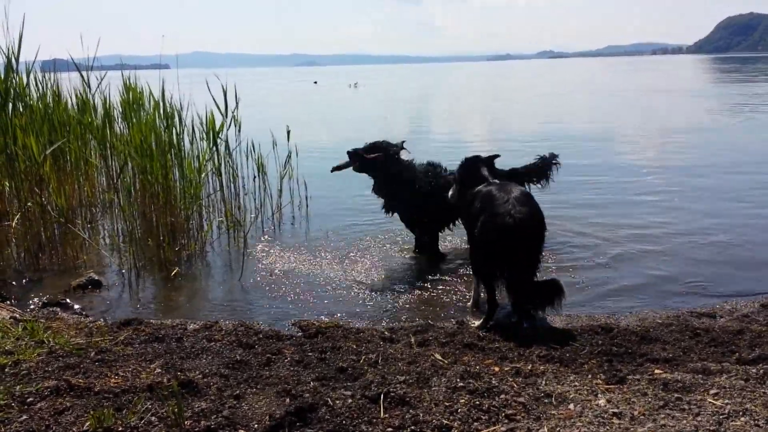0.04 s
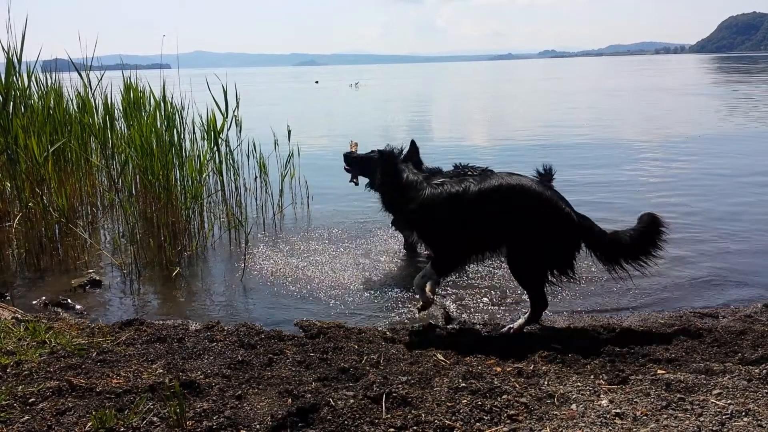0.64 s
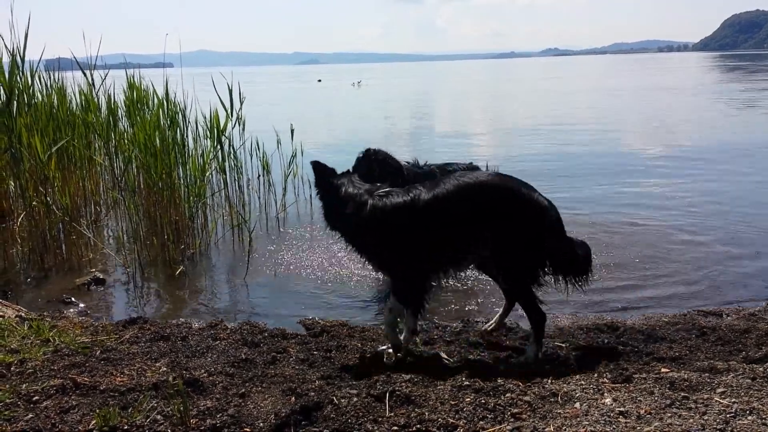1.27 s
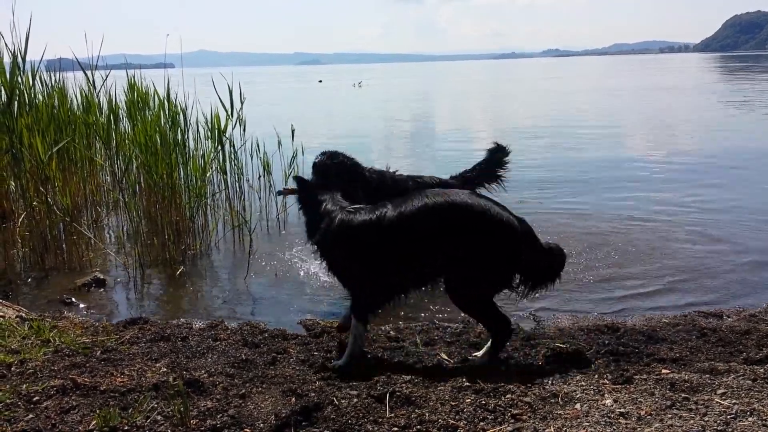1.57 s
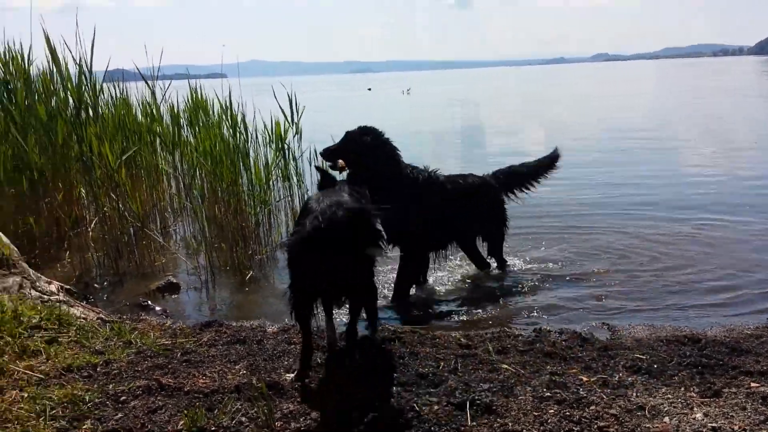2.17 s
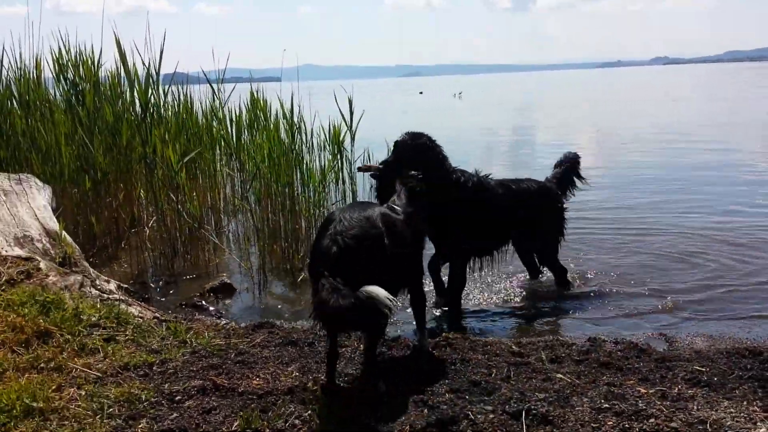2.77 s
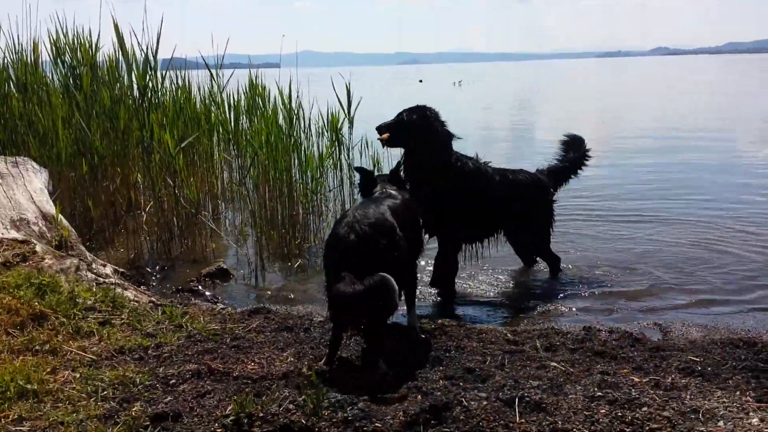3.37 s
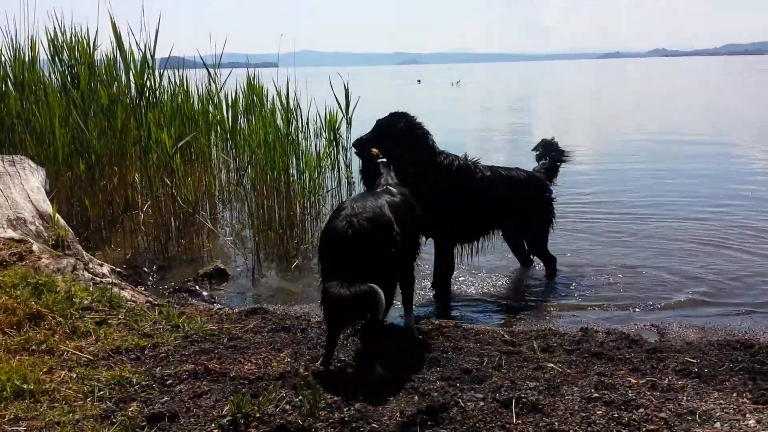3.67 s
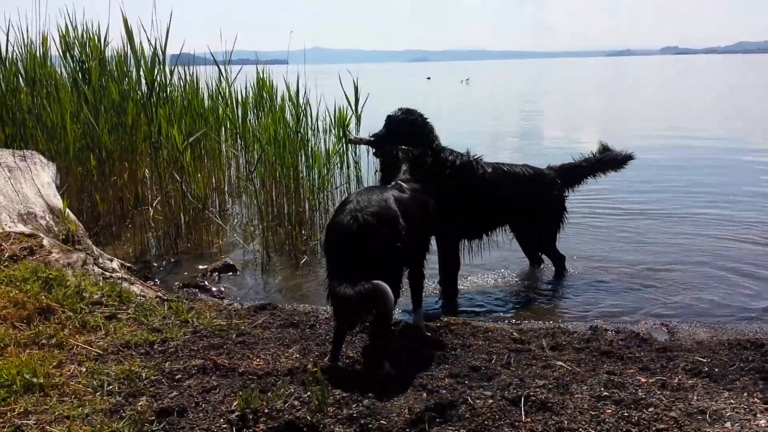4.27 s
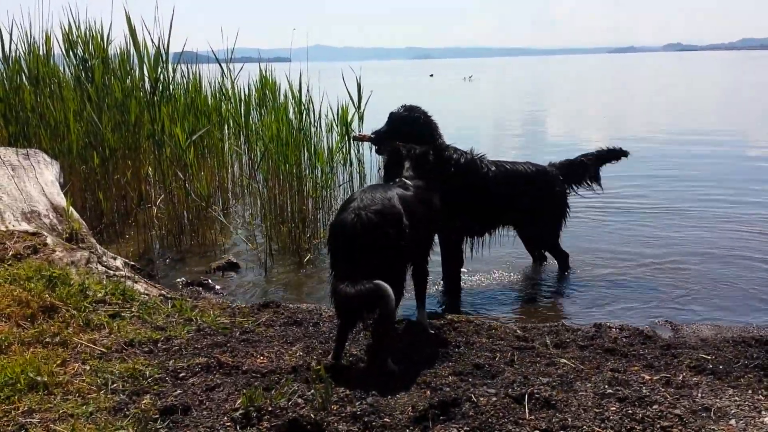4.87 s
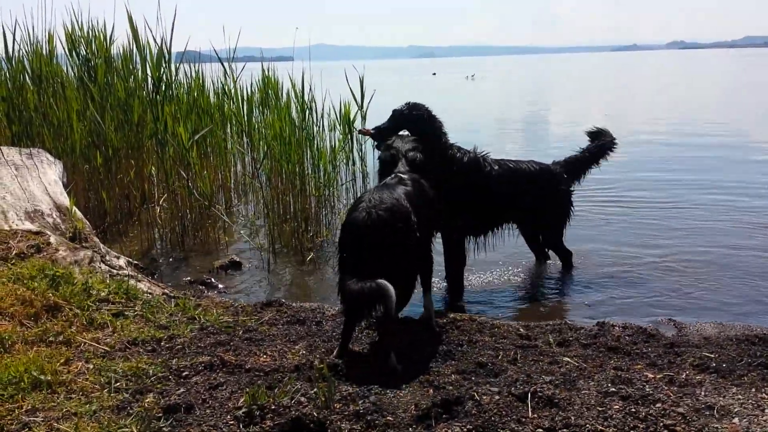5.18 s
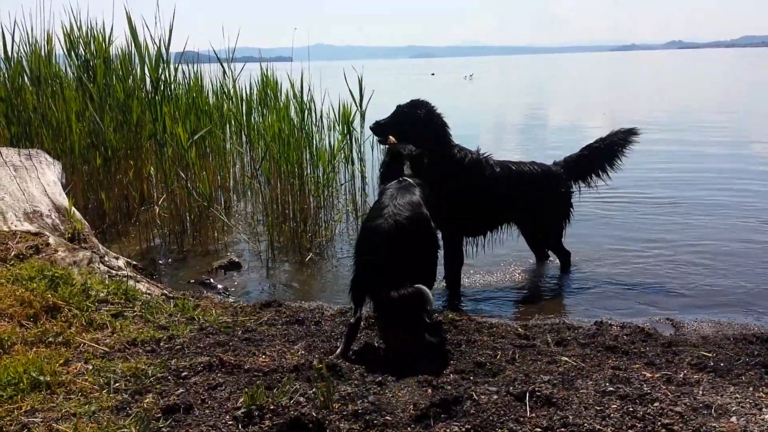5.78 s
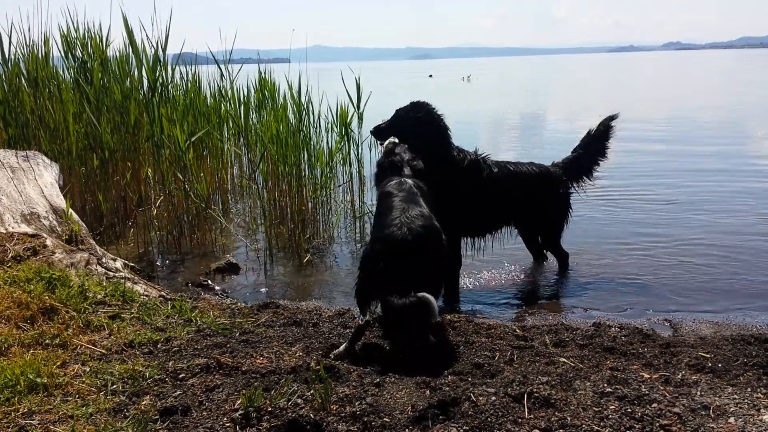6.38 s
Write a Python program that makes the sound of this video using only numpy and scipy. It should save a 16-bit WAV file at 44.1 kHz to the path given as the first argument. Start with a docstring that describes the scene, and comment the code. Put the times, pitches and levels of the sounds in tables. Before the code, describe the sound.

A dog's paws crunch on gravel with collar tags jingling, then shallow water splashes and drips over a low, distant engine drone.

```python
"""Paws crunch over wet gravel and collar tags jingle as a dog trots along a lake shore.
A second dog wades in the shallows, its legs throwing spray and folding air into the water as bubbles.
Drops then fall from a soaked coat and paws scuff the grit. A far engine drones across the lake, and a
bird calls faintly. The near sounds and the air are coloured by a small camera's hollow housing and its
two ports, which ring at different pitches."""
import sys
import numpy as np
from scipy import signal
from scipy.fft import rfft, irfft, next_fast_len
from scipy.io import wavfile
from scipy.ndimage import uniform_filter1d

SR = 44100
rng = np.random.default_rng(int(sys.argv[2]) if len(sys.argv) > 2 else 0)


def transcribe(signal):
    """Save signal, clipped to [-1, 1], as a 16-bit WAV file at the path in sys.argv[1]."""
    frames = np.atleast_2d(signal).T
    limited = np.clip(frames, -1, 1)
    pcm = np.round(limited * 32767).astype(np.int16)
    wavfile.write(sys.argv[1], SR, pcm)


N = 287973
TIME = np.arange(N) / SR

# grit under a paw: start_s, level_db, snap_db, thud_db, left_right_db, pebble_hz
PAW_CRUNCHES = [(0.1308, -18.5, 7, -24, 2, 6900), (0.1388, -17, 7, -30, 2, 4250),
                (0.172, -19, 13, -18, 0, 6560), (0.177, -26, 7, -3, 1, 6650),
                (0.1803, -27, 16, -20, -2, 6800), (0.1845, -31, 21, -36, 0, 7000),
                (0.278, -27.5, 2, -2.5, -2.5, 5000), (0.3489, -13, 11, -33, 8, 6970),
                (0.357, -24.5, 17.5, -40, -10, 6960), (0.3663, -36, 10, -38, -2, 6700),
                (0.3952, -15, 20, -18, 1, 6640), (0.4093, -25, 14, -25, -4, 6900),
                (0.4228, -18.5, 16, -28, 1, 7040), (0.4263, -16.5, 16, -26, 2, 6900),
                (0.5028, -21, 10, -7.5, 2, 4800), (0.5368, -22, 13, -18, 1, 6500),
                (0.5665, -17.5, 0, -20, 2, 7200), (0.579, -16.5, 17.5, -27, 2, 7320),
                (0.6057, -19, 3, -7, 1, 6560), (0.6132, -23, 15, -15, -3, 6650),
                (0.7093, -23.5, 2, -6, -2.5, 6500), (0.7686, -25, 16, -28, 0, 6900),
                (0.7794, -12.5, 9.5, -26, 2.5, 4850), (0.7819, -22.5, 11, -25, -3, 6740),
                (0.8155, -11.5, 10, -32, 3, 6950), (0.8315, -15, -1, -26, -3, 7000),
                (0.8448, -17.5, 5, -14, 4, 6900), (0.9103, -23, 2, -5, 0, 4850),
                (0.98, -13.5, 10, -15, 2, 4970), (1.0188, -23.5, 12, -8, 2, 6900),
                (1.025, -21.5, 7, -11.5, 4, 7040), (1.151, -27.5, 14, -2.5, 1, 5200),
                (1.2537, -29, 17, -25, 0, 6900), (1.844, -19, 7.5, -27, -7, 7370),
                (1.866, -14, 6, -24, 0, 6400), (1.8704, -14.5, 13, -30, 4, 5140),
                (2.155, -23, 3.5, -4, 1, 4900), (2.36, -25.5, 11, -18.5, -1, 4940),
                (5.456, -27, 6, -27, -3, 6560), (5.467, -23, 0, -25, 3, 6500),
                (5.5982, -20, 15, -30, 5, 6760), (5.6508, -27, 9, -34, -1, 7000)]
# spectra of cracking grit and of the paw's thud: freq_hz, gain_db
GRIT_SPECTRUM = [(300, -32.5), (1500, -13.5), (2500, -3), (3200, -17), (4000, -2.5), (5000, 3), (5800, -2),
                 (6800, 7.5), (7600, -0.5), (8800, -9), (12000, -9.5), (14500, -12.5)]
THUD_SPECTRUM = [(100, -20), (250, -1), (450, 0), (700, -12), (1300, -4), (2400, -5.5), (3200, -11),
                 (6000, -23.5)]

def crunches(pebble_db=-2, burst_db=-4, crumble_db=-3.5, crumble_per_thud=0.22):
    """Each crunch is a snap that rings a pebble, a dying crumble of small grains and a duller thud."""
    snap, pebble, crumble, thud = np.zeros((4, 2, N))
    for start_s, level_db, snap_db, thud_db, left_right_db, pebble_hz in PAW_CRUNCHES:
        level = amp(level_db + np.array([[0.5], [-0.5]]) * left_right_db)
        burst = amp(burst_db) * dying(t60_s=0.011, rise_s=0.00084)
        # a heavier thud crumbles more grit
        loose = amp(crumble_db + crumble_per_thud * thud_db) * dying(t60_s=0.055, rise_s=0.0032)
        add(snap, start_s + 0.00074, level * amp(snap_db))
        add(pebble, start_s + 0.00044, level * ring(pebble_hz, t60_s=0.011, glide=0, onset_cycles=0.38))
        add(crumble, start_s, level * (burst + loose))
        add(thud, start_s, level * amp(min(thud_db, 0)) * dying(t60_s=0.066, rise_s=0.0051))
    bright = snap + crumble * grains(per_s=3500, spread_db=2.5)
    dull = amp(-3) * thud * grains(per_s=3100, spread_db=1.5)
    return camera(bright, GRIT_SPECTRUM) + amp(pebble_db) * camera(pebble) + camera(dull, THUD_SPECTRUM)


def trot(length_s=1.295, roll_db=-43, settle_db=-28):
    """Grit rolls under the trotting paws and settles again after each crunch."""
    rolling = amp(roll_db) * held(0, length_s, rise_s=0.0027, t60_s=0.27)
    settling = [amp(level_db + settle_db) * held(start_s, length_s=0.026, rise_s=0.026, t60_s=1)
                for start_s, level_db, *_ in PAW_CRUNCHES if start_s < length_s]
    return amp(-2.5) * patter(power_sum([rolling, *settling]), GRIT_SPECTRUM, flicker_db=1, ping_db=-4)


# paw drags, mostly as the dog sits down: start_s, length_s, level_db
PAW_DRAGS = [(1.082, 0.051, -40.5), (5.282, 0.16, -46.5), (5.45, 0.021, -30), (5.506, 0.04, -39.5),
             (5.561, 0.024, -35), (5.653, 0.045, -48.5), (5.75, 0.052, -44.5), (5.848, 0.027, -46),
             (5.978, 0.028, -49), (6.418, 0.04, -46.5), (6.459, 0.07, -38)]
# fine grit and small drops: freq_hz, gain_db
FINE_SPECTRUM = [(200, -44), (900, -7.5), (1500, -17.5), (2300, -1.5), (3200, -13), (4200, -5), (5000, 2.5),
                 (5900, -5), (6900, 8.5), (8800, -5.5), (12500, -6.5), (14500, -14)]

def scuffs(gain_db=0.5):
    """A dragged paw pushes fine grit for as long as it moves."""
    drag = power_sum(amp(level_db) * held(start_s, length_s, rise_s=0.032, t60_s=0.17)
                     for start_s, length_s, level_db in PAW_DRAGS)
    return amp(gain_db) * patter(drag, FINE_SPECTRUM, flicker_db=2.5, ping_db=-6)


# tag strikes: start_s, level_db, high_modes_db
TAG_STRIKES = [(0.0014, -21.5, 0), (0.139, -12, 0), (0.202, -18, -4), (0.321, -26, -1), (0.356, -18, -12),
               (0.524, -27, 3), (0.579, -10, 1), (0.5891, -12, 2), (0.786, -17, -1), (0.986, -22, 1)]
# tag modes: pitch_hz, level_db, t60_s
TAG_MODES = [(2444, -13, 0.064), (6675, -13, .05), (7160, 3, 0.06), (8030, -3, 0.06), (14370, -11, 0.06)]

def collar_tags(gain_db=-3, detune=0.0025, chatter_rad=0.9, uneven_db=3.5, high_above_hz=7600):
    """Small metal tags ring and chatter against each other; some strikes ring brighter than others."""
    out = np.zeros(N)
    t = np.arange(SR // 2) / SR
    for start_s, level_db, high_modes_db in TAG_STRIKES:
        for pitch_hz, mode_db, t60_s in TAG_MODES:
            level_draw, pitch_draw = rng.standard_normal(2)
            contact = unit(uniform_filter1d(rng.standard_normal(len(t)), SR // 200))
            tone = np.sin(2 * np.pi * pitch_hz * (1 + detune * pitch_draw) * t + chatter_rad * contact)
            strike_db = level_db + gain_db + mode_db + uneven_db * level_draw
            strike_db += high_modes_db * (pitch_hz > high_above_hz)
            add(out, start_s, amp(strike_db) * dying(t60_s, rise_s=0.0032) * tone)
    return camera(out)


# sheets of spray thrown by a leg: start_s, length_s, level_db, t60_s
LEG_SPLASHES = [(1.193, 0.41, -43.5, 2), (1.503, 0.085, -38, 0.86), (1.63, 0.18, -34.5, 1.5),
                (1.831, 0.1, -32, 0.69), (2.033, 0.019, -35.5, 1.1), (2.448, 0.039, -42, 0.56),
                (2.632, 0.048, -42, 0.3), (2.714, 0.32, -47, 0.54), (3.111, 0.2, -41, 0.24)]
# spectra of the spray and of its finest drops: freq_hz, gain_db
SPRAY_SPECTRUM = [(200, -31.5), (900, -1.5), (1600, -7), (2500, -0.5), (3200, -10.5), (4000, -3), (5100, 4),
                  (6000, -1.5), (7100, 4), (8500, -5), (11000, -8.5), (14500, -12.5)]
MIST_SPECTRUM = [(2000, -19), (6000, 12), (9000, -1), (14500, -15)]

def spray(gain_db=-2, rise_s=0.017, runoff_db=-17, mist_db=-11, mist_knee_db=-38):
    """Splashes rain back on the lake and water runs off the legs; hard splashes add a fine mist."""
    falling = power_sum(amp(level_db) * held(start_s, length_s, rise_s, t60_s)
                        for start_s, length_s, level_db, t60_s in LEG_SPLASHES)
    runoff = power_sum(amp(level_db + runoff_db) * held(start_s, length_s, rise_s, t60_s=6.5)
                       for start_s, length_s, level_db, _ in LEG_SPLASHES)
    mist_share = np.minimum(falling / amp(mist_knee_db), 1)
    mist = falling * mist_share * grains(per_s=6000, spread_db=15)
    rain = patter(power_sum([falling, runoff]), SPRAY_SPECTRUM, flicker_db=1.72, ping_db=-4, spread_db=2)
    return amp(gain_db) * rain + amp(mist_db) * camera(mist, MIST_SPECTRUM)


# legs pushing through water: start_s, length_s, level_db, bubble_hz, t60_s
LEG_STROKES = [(1.4, 0.046, -32.5, 980, 0.12), (1.46, 0.078, -36.5, 566, 0.35),
               (1.538, 0.062, -35, 950, 0.55), (1.632, 0.059, -33.5, 808, 0.46),
               (1.805, 0.028, -44, 750, 0.34), (1.884, 0.025, -36.5, 745, 0.27),
               (2.035, 0.035, -37.5, 534, 0.19), (2.164, 0.019, -42.5, 685, 0.31),
               (2.658, 0.023, -33.5, 1200, 0.15), (2.7, 0.11, -44.5, 700, 0.46)]
# froth around a leg: freq_hz, gain_db
FROTH_SPECTRUM = [(120, -24), (280, 5), (500, 4), (900, 7.5), (1320, 3.5), (1800, 1), (2600, 2),
                  (5000, -36)]

def slosh(bubbles_db=-5, froth_db=-9, spread_octaves=0.58, t60_cycles=22, count=70):
    """Each stroke folds air into the water: a dying cloud of bubbles in a rush of froth."""
    cloud, churn = np.zeros((2, N))
    for start_s, length_s, level_db, bubble_hz, t60_s in LEG_STROKES:
        bubbles = np.zeros(SR // 2)
        force = amp(level_db) * held(0, length_s, rise_s=0.0042, t60_s=t60_s)[:len(bubbles)]
        for k, (time_draw, pitch_draw, level_draw) in enumerate(rng.standard_normal((count, 3))):
            pitch_hz = np.clip(bubble_hz * 2 ** (spread_octaves * pitch_draw), 220, 2700)
            bubble = ring(pitch_hz, t60_cycles / pitch_hz, glide=0.17, onset_cycles=1.5)
            birth_s = (k + 0.385 * time_draw) / count / 2
            add(bubbles, birth_s, amp(2 * level_draw) * bubble)
        add(cloud, start_s, force * unit(bubbles))
        add(churn, start_s, force)
    at_ports = np.array([cloud, np.roll(cloud, shift=2)])  # slightly longer path to the right port
    froth = churn * grains(per_s=2200, spread_db=3.5, lag_samples=3.6)
    return amp(bubbles_db) * camera(at_ports) + amp(froth_db) * camera(froth, FROTH_SPECTRUM)


# hollows behind a plunging leg: start_s, length_s, start_hz, end_hz, level_db
WATER_HOLLOWS = [(1.375, 0.07, 830, 440, -32), (1.62, 0.045, 660, 1020, -27)]

def gulps():
    """A hollow rings lower as it opens and higher as the water closes it."""
    out = np.zeros(N)
    for start_s, length_s, start_hz, end_hz, level_db in WATER_HOLLOWS:
        sweep_hz = np.geomspace(start_hz, end_hz, int(length_s * SR))
        tone = wavering_tone(sweep_hz, depth=0.058, rate_hz=150)
        add(out, start_s, amp(level_db) * np.sqrt(np.hanning(len(tone))) * tone)
    return camera(out)


# large air pockets in the water, heavy drops from the coat: start_s, level_db, pitch_hz
AIR_POCKETS = [(0.057, -36, 964), (0.178, -28.5, 435), (0.257, -38, 1350), (0.399, -27.5, 1300),
               (0.563, -26, 1635), (0.783, -29.5, 1295), (0.858, -26, 2480), (0.865, -24.5, 1320),
               (0.99, -33, 930), (1.042, -34.5, 1236), (1.276, -29, 1400), (1.379, -28, 805),
               (1.428, -30, 856), (1.463, -23, 455), (1.495, -22, 484), (1.529, -25.5, 463),
               (1.567, -32, 1300), (1.638, -26.5, 340), (1.648, -29, 1307), (1.68, -29, 970),
               (1.975, -32.5, 990), (2.254, -38, 850), (2.663, -28, 925), (2.694, -29.5, 935),
               (2.729, -31, 915), (2.763, -35, 1470), (2.8, -36, 903), (2.808, -31.5, 1600),
               (2.982, -36, 1280), (3.329, -36.5, 950), (3.997, -39, 775), (5.706, -45, 870)]
COAT_DRIPS = [(1.969, -23, 5130), (2.737, -29.5, 7000), (2.859, -25, 5700), (3.054, -33, 6860),
              (3.084, -27.5, 4700), (3.366, -34, 7000), (3.3902, -36, 5400), (3.738, -37.5, 3830),
              (3.8297, -43, 7260), (3.99, -36.5, 6930), (4.129, -34, 5260), (4.822, -31.5, 6800),
              (4.8235, -37.5, 4520), (4.893, -30.5, 4930), (4.9198, -37, 6620), (4.949, -40, 5200),
              (5.03, -39, 5350), (5.097, -36.5, 7000), (5.1504, -35, 6900), (5.1743, -34.5, 5110),
              (5.2061, -37, 4940), (6.004, -32, 7000), (6.112, -39, 5090), (6.255, -36, 5400),
              (6.294, -36, 4780), (6.341, -34.5, 6860)]

def plops_and_drips(plop_db=-2, swell_s=0.0042, gurgle_rad=0.86, drip_db=6, spatter_db=-13):
    """Air pockets swell and gurgle shut; falling drops tick, ring a tiny bubble and spatter."""
    out, spatter = np.zeros((2, N))
    t = np.arange(SR // 10) / SR
    swell = (t / swell_s * np.exp(1 - t / swell_s)) ** 2
    for start_s, level_db, pitch_hz in AIR_POCKETS:
        wobble = unit(np.convolve(rng.standard_normal(len(t)), np.hanning(SR // 400), "same"))
        tone = np.sin(2 * np.pi * pitch_hz * t + gurgle_rad * wobble)
        add(out, start_s - 0.002, amp(level_db + plop_db) * swell * tone)
    for start_s, level_db, pitch_hz in COAT_DRIPS:
        drip = ring(pitch_hz, t60_s=0.01, glide=0.063, onset_cycles=2.6)
        drip[0] += 0.41  # impact tick
        add(out, start_s, amp(level_db + drip_db) * drip)
        add(spatter, start_s, amp(level_db + spatter_db) * dying(t60_s=0.042, rise_s=0.0003))
    return camera(out) + camera(spatter * grains(per_s=2500, spread_db=2), GRIT_SPECTRUM)


def trickle(tick_db=-66, ring_db=-67):
    """Smaller drops keep running off the coat: most only tick, some ring."""
    ticks = grains(per_s=60, spread_db=2)
    rings = pings(per_s=40, t60_cycles=30, low_hz=3800, high_hz=7600)
    return amp(tick_db) * camera(ticks, GRIT_SPECTRUM) + amp(ring_db) * camera(rings, FINE_SPECTRUM)


# engine tones: pitch_hz, level_db
ENGINE_TONES = [(80.7, -50.5), (82.2, -61), (109.1, -39.5), (141.3, -52.5), (191, -63), (218.2, -54),
                (327.3, -58.5), (436.4, -60.5), (463.5, -65), (572.8, -66)]
# engine's slow fade: time_s, gain_db
ENGINE_FADE = [(0, 1), (1.8, 0), (3, -0.5), (4.6, -1), (6.5, -1.8)]

def engine(waver=0.0023, fade_db=1.0):
    """A far engine drones; its higher tones fade in and out more on their way over the water."""
    clock_s = np.cumsum(1 + waver * wander(rate_hz=3.5)) / SR
    drone = np.zeros(N)
    for pitch_hz, level_db in ENGINE_TONES:
        level = amp(level_db + fade_db * np.sqrt(pitch_hz / 200) * wander(rate_hz=2.9))
        drone += level * np.sin(2 * np.pi * (pitch_hz * clock_s + rng.random()))
    return np.sqrt(2) * drone * amp(np.interp(TIME, *np.transpose(ENGINE_FADE)))


# bird calls: start_s, length_s, start_hz, end_hz, level_db
BIRD_CALLS = [(4.315, 0.11, 3400, 3560, -53), (4.945, 0.06, 3750, 4050, -52), (5.03, 0.11, 3620, 3780, -54)]

def bird():
    """A far bird gives thin, unsteady rising calls."""
    out = np.zeros(N)
    for start_s, length_s, start_hz, end_hz, level_db in BIRD_CALLS:
        sweep_hz = np.linspace(start_hz, end_hz, int(length_s * SR))
        tone = wavering_tone(sweep_hz, depth=0.013, rate_hz=200)
        add(out, start_s, amp(level_db) * np.hanning(len(tone)) * tone)
    return out


# open-air rumble and hiss: freq_hz, gain_db
RUMBLE_SPECTRUM = [(20, -17), (40, -11.5), (60, -0.5), (120, 2), (170, -2), (250, -2.5), (350, -9),
                   (480, -9.5), (700, -13), (1200, -38), (2500, -32)]
HISS_SPECTRUM = [(300, -9.5), (700, -0.5), (1250, 3.5), (1600, -1.5), (2450, 7), (3200, -3), (4800, 2),
                 (6000, -2.5), (7000, -2), (9000, -9.5), (14500, -22.5)]
# likeness of the air at the two ports: freq_hz, coherence
AIR_COHERENCE = [(30, 0.036), (120, 0.83), (300, 0.66), (550, 0.31), (1200, 0.0039), (2500, 0), (5000, 0)]

def air(spectrum, level_db, swell_db=0.7):
    """Open-air noise, alike in both ports only in the bass."""
    size = next_fast_len(N, True)
    left, unrelated = rfft(rng.standard_normal((2, size)))
    coherence = at_hz(AIR_COHERENCE, np.fft.rfftfreq(size, 1 / SR))
    right = coherence * left + np.sqrt(1 - coherence ** 2) * unrelated
    noise = irfft(np.array([left, right]), size)[:, :N]
    return amp(level_db + swell_db * wander(rate_hz=5.5)) * unit(camera(noise, spectrum))


def shore(x, scatter_db=-13, t60_s=0.16):
    """Reeds and bank scatter a short tail."""
    t = np.arange(SR // 3) / SR
    tail = rng.standard_normal((2, len(t))) * amp(-60 * t / t60_s) * (t > 0.002)
    tail /= np.linalg.norm(tail, axis=1, keepdims=True)
    return x + amp(scatter_db) * signal.oaconvolve(x, tail, axes=1)[:, :N]


# port resonances: freq_hz, left_right_db
PORT_BALANCE = [(1000, -0.5), (1350, 1), (2000, -1), (2550, -7.5), (3200, -6), (4000, 7), (5000, 4),
                (5700, -1.5), (6700, -12), (8000, -10.5), (9000, -7.5), (11000, -16), (14000, -12)]
# hollow housing, neutral source: freq_hz, gain_db
HOUSING_SPECTRUM = [(300, 0), (460, 2), (680, -2.5), (900, 3), (1020, 3), (1090, -8), (1150, -8),
                    (1250, 3.5), (1400, 2), (1500, -6), (1660, 2), (1810, 1), (1900, -4), (2080, 2.5),
                    (2270, -1.5), (2470, 2), (2800, -1), (3220, -3), (3420, 3.5), (3800, .5)]
FLAT_SPECTRUM = [(100, 0), (15000, 0)]

def camera(x, spectrum=FLAT_SPECTRUM, size=2048):
    """Shapes a source by its spectrum and the housing; port resonances split it left and right."""
    hz = abs(np.fft.fftfreq(size, 1 / SR))
    ratio = amp(at_hz(PORT_BALANCE, hz))
    split = np.array([ratio, np.ones(size)]) * np.sqrt(2 / (1 + ratio ** 2))
    gain = unit(amp(at_hz(spectrum, hz))) * amp(at_hz(HOUSING_SPECTRUM, hz)) * split
    minimum_phase = np.exp(np.conj(signal.hilbert(np.log(gain))))
    taps = np.fft.ifft(minimum_phase).real
    return signal.oaconvolve(x * np.ones((2, 1)), taps, axes=1)[:, :N]


def patter(envelope, spectrum, flicker_db, ping_db, spread_db=0.5):
    """Thousands of tiny impacts arrive in clumps; some ring."""
    impacts = grains(per_s=5000, spread_db=spread_db) + amp(ping_db) * pings(per_s=900, t60_cycles=54)
    return camera(impacts * envelope * amp(flicker_db * wander(rate_hz=51)), spectrum)


def grains(per_s, spread_db, lag_samples=3.0):
    """Random clicks of uneven size, each with its own delay between the ports."""
    left_at = np.flatnonzero(rng.random(N) < per_s / SR)
    size = amp(spread_db * np.minimum(rng.exponential(1, N)[left_at], 4))
    size *= rng.choice([-1, 1], N)[left_at]
    lag = np.round(lag_samples * rng.standard_normal(N)[left_at]).astype(int)
    right_at = np.clip(left_at + lag, 0, N - 1)
    return unit(np.array([np.bincount(left_at, size, N), np.bincount(right_at, size, N)]))


def pings(per_s, t60_cycles, spread_db=1.5, low_hz=1500, high_hz=11000, pitches=40):
    """Tiny bubbles and pebbles of many sizes, each with a brief pitch."""
    out = np.zeros(N)
    for hz in np.geomspace(low_hz, high_hz, pitches):
        starts = rng.integers(0, N, (int(per_s * TIME[-1] / pitches), 1))
        ping = ring(hz * rng.uniform(0.97, 1.03), t60_cycles / hz, glide=0.33, onset_cycles=0.52)
        size = np.sqrt(hz) * amp(spread_db * np.minimum(rng.exponential(1, starts.shape), 3))
        np.add.at(out, (starts + np.arange(len(ping))) % N, size * ping)
    return unit(out)


def ring(pitch_hz, t60_s, glide, onset_cycles):
    """A pebble or bubble rings down; glide lifts the pitch, as when a bubble nears the surface."""
    t = np.arange(int(np.clip(t60_s, 0.003, 0.2) * SR)) / SR
    cycles = pitch_hz * t * (1 + glide * t / t60_s / 2)
    return amp(-60 * t / t60_s) * (1 - np.exp(-cycles / onset_cycles)) * np.sin(2 * np.pi * cycles)


def wavering_tone(sweep_hz, depth, rate_hz):
    """Sine that strays at random around a pitch curve."""
    pitch_hz = sweep_hz * (1 + depth * wander(rate_hz)[:len(sweep_hz)])
    return np.sin(2 * np.pi * np.cumsum(pitch_hz) / SR)


def wander(rate_hz):
    """Random drift of rms 1, rolling off above rate_hz."""
    t = np.arange(0, TIME[-1] + 0.1, 0.002)
    hz = np.fft.rfftfreq(len(t), t[1])
    lowpass = np.exp(-(hz / rate_hz) ** 2) * (hz > 0)
    drift = irfft(rfft(rng.standard_normal(len(t))) * lowpass, len(t))
    return np.interp(TIME, t, unit(drift))


def dying(t60_s, rise_s):
    """Impact envelope: short rise, exponential fall."""
    t = np.arange(SR // 2) / SR
    return amp(-60 * t / t60_s) * (1 - np.exp(-t / rise_s))


def held(start_s, length_s, rise_s, t60_s):
    """Movement envelope: rise, hold, exponential fall."""
    t = TIME - start_s
    return np.clip(t / rise_s, 0, 1) * amp(-60 * np.maximum(t - length_s, 0) / t60_s)


def power_sum(envelopes):
    """Unrelated showers of grains add in power."""
    return np.sqrt(sum(envelope ** 2 for envelope in envelopes))


def amp(db):
    """Decibels to gain."""
    return 10 ** (np.asarray(db) / 20)


def unit(x):
    """Scales the mean of the channels to rms 1."""
    return x / np.sqrt(np.mean(np.atleast_2d(x).mean(0) ** 2) + 1e-20)


def at_hz(points, hz):
    """Reads a curve on a log-frequency axis."""
    freq_hz, value = np.transpose(points)
    return np.interp(np.log(hz + 1), np.log(freq_hz), value)


def add(mix, start_s, sound):
    """Mixes a sound in at start_s."""
    part = mix[..., max(round(start_s * SR), 0):][..., :sound.shape[-1]]
    part += sound[..., :part.shape[-1]]


def scene():
    """Two dogs at the water's edge, with the lake behind them."""
    gravel = crunches() + trot() + scuffs()
    water = spray() + slosh() + gulps() + plops_and_drips() + trickle()
    lake = engine() + bird() + air(RUMBLE_SPECTRUM, level_db=-48) + air(HISS_SPECTRUM, level_db=-52.5)
    return shore(gravel + collar_tags() + water) + lake


def record(dry):
    """The camera's steep band limit."""
    cutoff_hz = 14640
    lowpass = signal.firwin(255, cutoff_hz, window=("kaiser", 8), fs=SR)
    return signal.oaconvolve(dry, lowpass[None], "same", axes=1)


dry = scene()
out = record(dry)
transcribe(out)
```